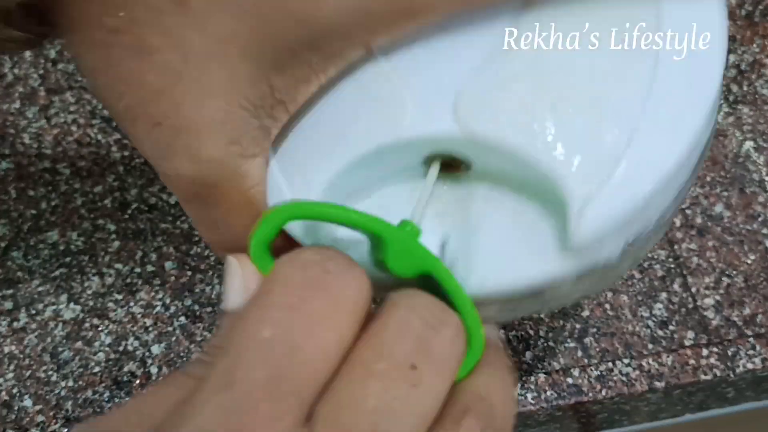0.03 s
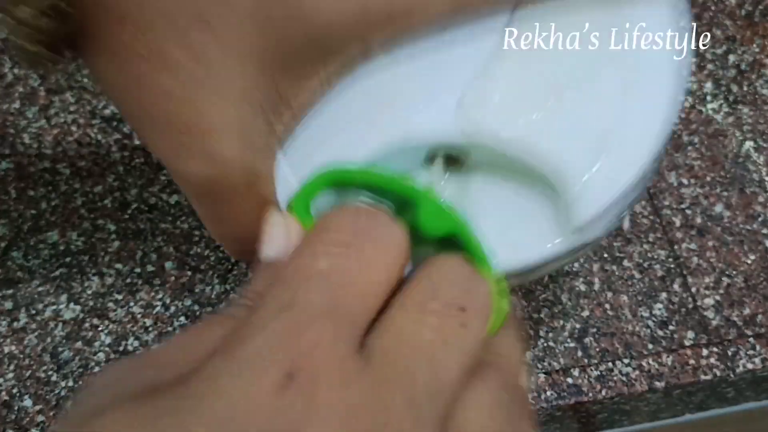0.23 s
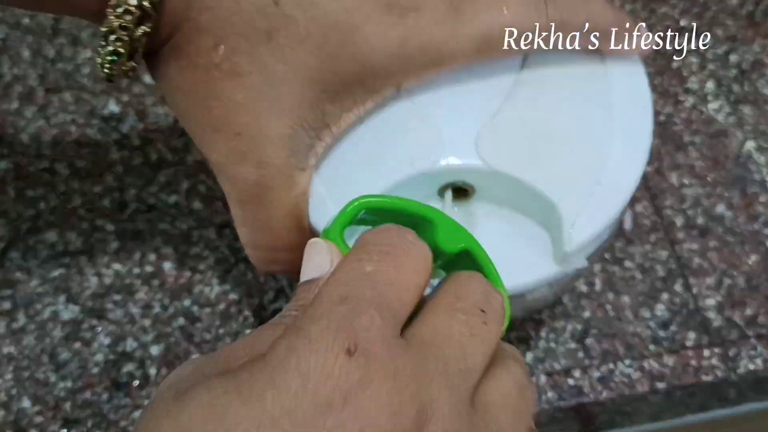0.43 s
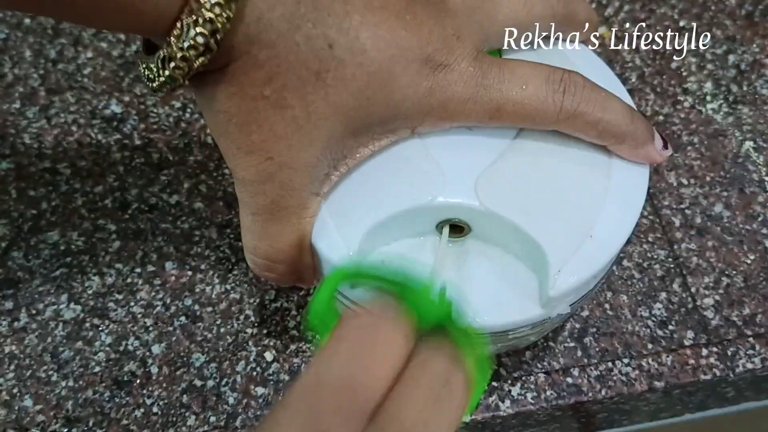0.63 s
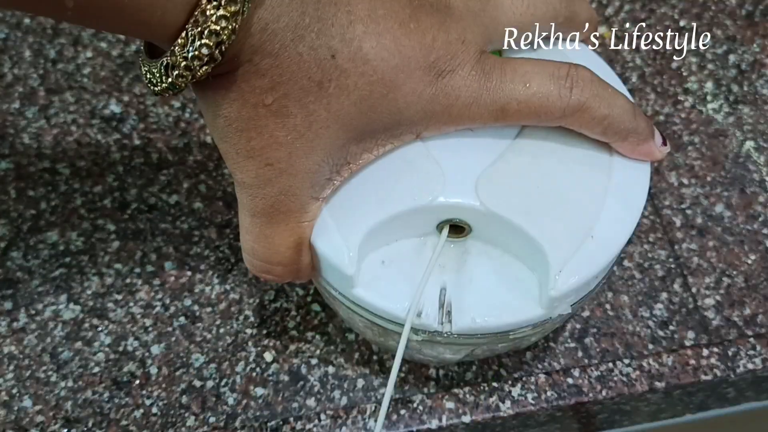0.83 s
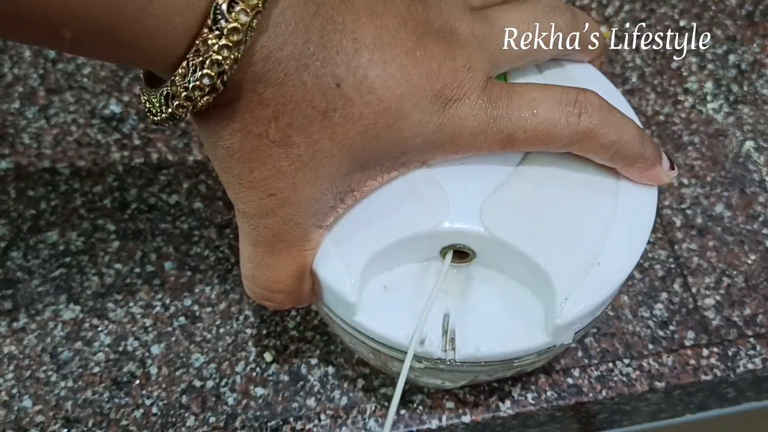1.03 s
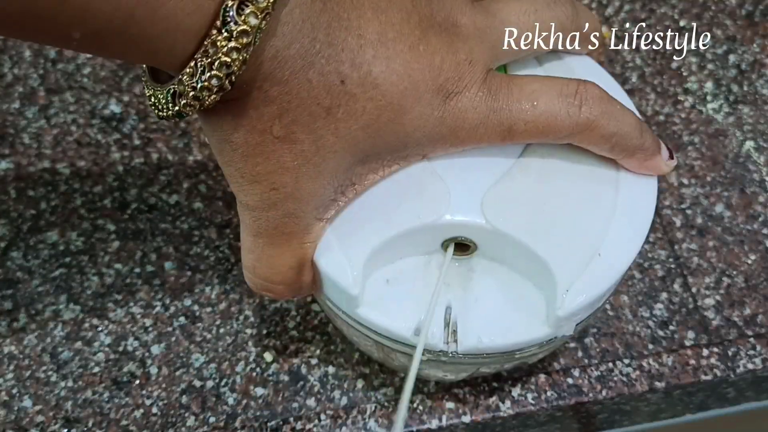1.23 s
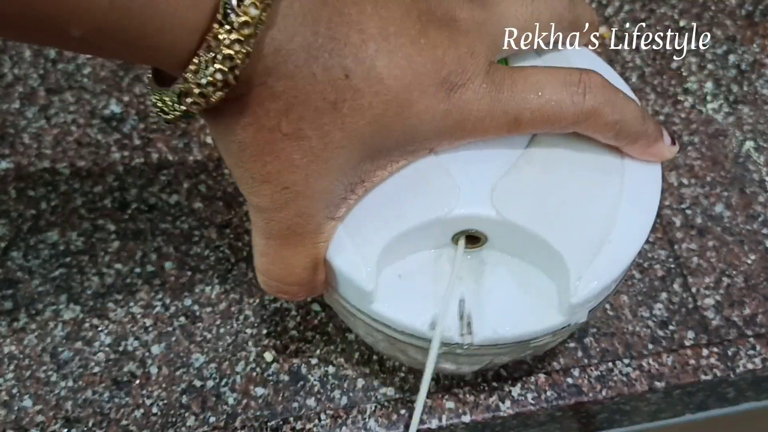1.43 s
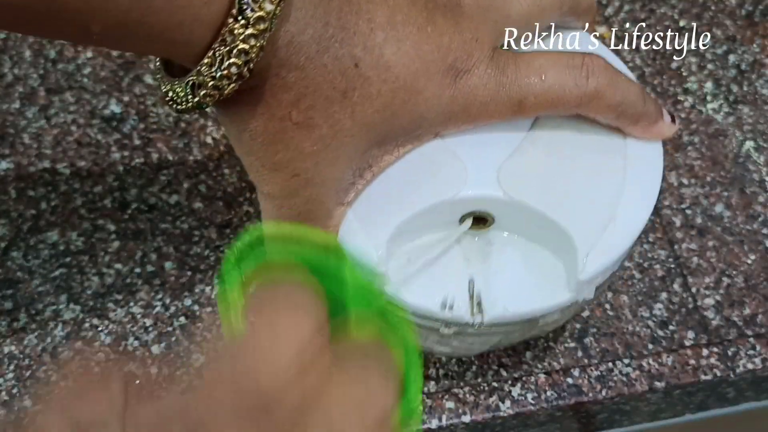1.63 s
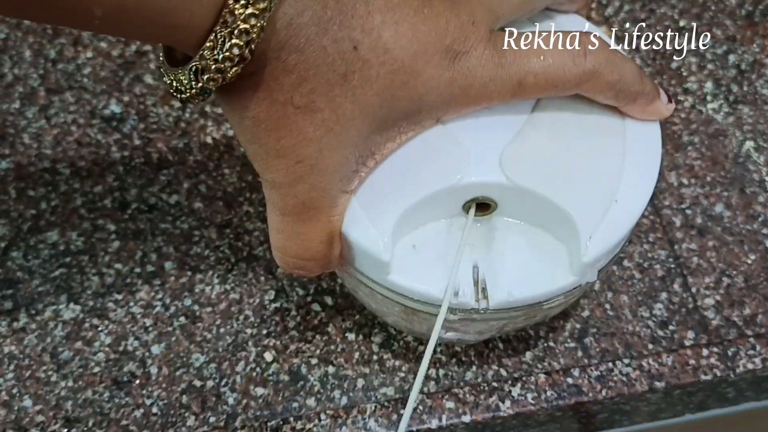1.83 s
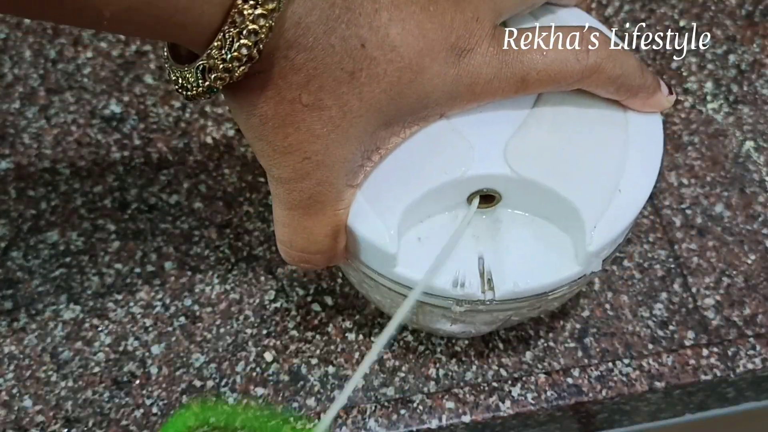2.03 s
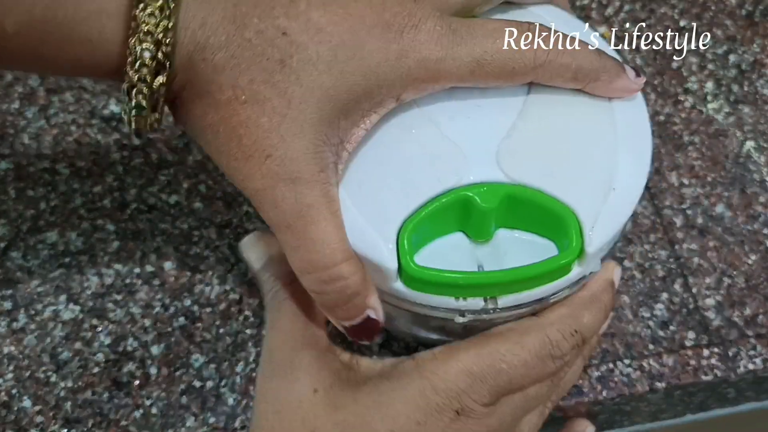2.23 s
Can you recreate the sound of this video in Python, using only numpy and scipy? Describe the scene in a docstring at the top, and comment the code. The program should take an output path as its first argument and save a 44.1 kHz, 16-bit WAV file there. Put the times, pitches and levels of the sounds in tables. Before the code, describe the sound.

Close up in a kitchen, a hand-pulled food chopper gives small plastic knocks and finger rubs, then three whirring, clattering bursts. A high rasp of recoiling cord follows each one, and the chopped pieces finally tumble softly to rest.

```python
"""A faint wash of room ring dies away. A plastic pull-cord food chopper is settled on a stone kitchen
counter: its housing knocks, fingers rub and nails tick. Then the cord is pulled three times. On each
pull the blades fling food against the resonant bowl, the blade shaft sings, and the cord zips taut at
the end of its travel; the spring then reels it in with a bright friction rasp over a slipping ratchet.
At last the pieces tumble to rest and the kitchen's reverberation dies away."""
import sys
import numpy as np
from scipy import signal
from scipy.fft import rfft, irfft
from scipy.io import wavfile

SR = 44100
rng = np.random.default_rng(int(sys.argv[2]) if len(sys.argv) > 2 else 0)


def unload_wav(signal):
    """Save mono or channel-first audio to the path in sys.argv[1] as 16-bit WAV at rate SR, clipped to [-1, 1]."""
    wavfile.write(
        sys.argv[1],
        SR,
        np.round(np.clip(np.atleast_2d(signal).T, -1, 1) * 32767).astype(np.int16),
    )


N = 105840
TAPS = 4096  # samples in a short impulse response

# Spectra of background and reverberation. Each row: frequency in Hz, relative level in dB.
BACKGROUND_SPECTRUM = [(30, 3), (90, 7.5), (160, 0), (400, -3.5), (800, -7.5), (1500, -5.5), (3200, -14),
                       (7000, -12.5), (10000, -27), (16000, -31)]
ROOM_SPECTRUM = [(50, -12.5), (120, 4.5), (400, 0.5), (1500, -2), (4000, -3), (9000, -6.5), (16000, -29)]
# Decay of the kitchen. Each row: frequency in Hz, reverberation time in seconds.
ROOM_DECAY = [(60, 0.81), (150, 0.46), (400, 0.59), (1500, 0.71), (4000, 0.56), (8000, 0.45), (16000, 0.26)]

# Faint tinkling as the hands shift. Each row: start in seconds, length in seconds, level in dB.
TINKLE_BURSTS = [(.095, 0.057, -38.5), (.205, .008, -39), (0.369, .045, -46), (.446, 0.0037, -44)]
# First a faint wash of room ring dying away at the opening; the later rows are finger rubs.
# Each row: start in seconds, length in seconds, level in dB, treble cutoff in Hz.
WASH_AND_RUBS = [(0., 0.026, -41.5, 5130), (0.104, 0.044, -34, 7000), (0.172, 0.038, -43, 3500),
                 (0.236, 0.06, -35, 9050), (0.37, 0.019, -37, 7000), (0.617, 0.017, -32, 4000)]
# Nails and cord on plastic. Each row: start in seconds, level in dB, treble cutoff in Hz.
DRY_TICKS = [(0.1054, -19, 12000), (0.1639, -0.5, 4070), (0.6191, -17, 8900), (0.7433, -22, 9000),
             (1.617, 1.5, 9000), (1.7856, -2, 22000), (2.0365, -16, 7100), (2.0894, -2.5, 7000),
             (2.0981, -0.5, 7000)]
# Knocks of the housing. Each row: start in seconds, thump level in dB, thump pitch in Hz,
# thump's 60 dB decay time in seconds, crack level in dB, crack's treble cutoff in Hz.
HOUSING_KNOCKS = [(0.1194, -11.5, 510, 0.013, -11.5, 3500), (0.2029, -9, 556, 0.019, -44, 1500),
                  (0.2149, -4, 665, 0.026, -11.5, 1800), (.2275, -26, 704, 0.014, -22, 2500),
                  (.2296, 5, 326, 0.016, 1.5, 3600), (.2318, -0.5, 488, 0.014, -31, 3600),
                  (.2452, -9, 600, 0.016, -10, 2500), (.416, -20, 462, 0.04, -32, 2500),
                  (0.4382, -9, 395, 0.016, -22.5, 3000), (0.4505, -9.5, 400, 0.03, -7, 2650),
                  (.4532, -2, 725, .012, -18, 1470), (0.6059, -7.5, 245, 0.029, -19, 1480),
                  (0.6321, -19, 255, 0.021, -14.5, 2940), (.7495, -13, 612, 0.039, -14, 7100),
                  (.7532, -4.5, 628, 0.015, -9.5, 8240), (0.9571, -0.5, 270, 0.029, -2, 1620),
                  (.980, 0, 420, 0.011, -29, 2000), (.9835, -13, 262, 0.0074, -9, 2000),
                  (1.282, -18.5, 400, 0.028, -18, 5030), (1.438, -4, 270, 0.019, -9, 2000),
                  (1.751, -15.5, 296, 0.037, -13, 9000), (2.168, -25.5, 167, 0.045, -42, 3000)]
# Modes of the housing. Each row: ratio to the thump pitch, relative level in dB.
HOUSING_MODES = [(.6, -6), (1, -1.5), (1.62, -6.5), (2.4, -17.5)]

# Envelopes: the force of each pull, the speed of each rewind (as loudness of its rasp) and the
# final tumble. Each row of a curve: time in seconds, relative level in dB.
PULL_FORCES = [
    [(0.75, -37), (0.836, -32), (0.886, -19.5), (0.95, -21), (0.954, -11.5), (1.064, -40.5), (1.07, -40)],
    [(1.27, -36), (1.292, -31.5), (1.308, -34.5), (1.356, -21), (1.45, -17.5), (1.504, -33), (1.53, -35)],
    [(1.75, -50), (1.752, -28), (1.87, -22), (1.878, -22.5), (1.89, -21.5), (1.956, -25.5), (2.0, -53)],
]
REWIND_SPEEDS = [
    [(1.03, -41), (1.08, -21.5), (1.12, -18), (1.186, -22.5), (1.268, -42.5), (1.28, -32.5)],
    [(1.5, -28.5), (1.516, -43), (1.54, -22), (1.616, -16), (1.67, -31.5), (1.745, -39.5)],
    [(1.98, -38.5), (2.018, -21.5), (2.046, -16.5), (2.096, -18.5), (2.155, -32.5)],
]
TUMBLE_ENVELOPE = [(2.163, -27.5), (2.22, -32.5), (2.3, -39.5), (2.4, -51)]
# The cord coming taut. Each row: start in seconds, time until decay in seconds, level in dB.
CORD_ZIPS = [(0.899, 0.0033, -24.5), (0.9575, .007, -20), (1.439, 0.0054, -18), (1.924, 0.0076, -24)]
# Large pieces striking the bowl. Each row: start in seconds, peak level in dB.
CHUNK_STRIKES = [(0.774, -21), (0.7949, -15.5), (0.806, -25), (0.8756, -1), (0.8796, -17), (0.8888, -19),
                 (0.901, -7), (0.914, -3), (0.9278, 1), (1.3592, -7), (1.37, -9), (1.377, -7),
                 (1.4009, -17), (1.414, -13), (1.844, -10), (1.869, -24), (1.894, -9)]

# Smooth spectra of the brief sounds, then of the lid, the reel (cord guide and spring) and the bowl.
# Each row: frequency in Hz, relative level in dB.
WASH_AND_RUB_SPECTRUM = [(100, -2), (400, 12.5), (900, 4), (2500, -2.5), (5000, -2), (8500, 0.5),
                         (10000, -6), (16000, -5)]
TICK_SPECTRUM = [(100, -19), (700, -9.5), (1400, 0), (2300, 0), (4000, 3), (6000, 2.5), (9000, 2.5),
                 (16000, -17)]
CRACK_SPECTRUM = [(60, -78), (300, 2.5), (1000, 7.5), (1600, 5), (2200, 3.5), (4000, 9), (5500, 4.5),
                  (8000, 9), (16000, 2)]
TUMBLE_SPECTRUM = [(40, -25), (85, 0), (140, 1.5), (420, 4), (900, -10.5), (1700, -10), (2400, -26.5),
                   (7000, -21.5), (10000, -40), (16000, -39)]
SLIDE_SPECTRUM = [(200, -15), (1500, -11), (3500, 14), (5000, 0), (7500, 0.5), (9500, -5.5), (12000, -11),
                  (16000, -3)]
LID_SPECTRUM = [(50, -57), (140, -14.5), (300, -1), (800, -9), (1500, -7), (2150, -16), (4000, -12.5),
                (7000, -14), (16000, -27.5)]
REEL_SPECTRUM = [(200, -57), (2000, -24), (4000, -28), (5300, -26), (6600, -13.5), (8200, -10), (9700, -10),
                 (10500, -15.5), (12100, -30), (13000, -12), (14000, -23), (15200, -20)]
BOWL_SPECTRUM = [(50, -42), (130, -16), (260, -15.5), (430, -8.5), (1000, -15.5), (1600, -6), (2050, -16),
                 (3600, -15), (5000, -19.5), (7500, -19.5), (9500, -28), (16000, -27)]
# Resonances of those three bodies. Each row: frequency in Hz, half-width in Hz, relative level in dB.
LID_RESONANCES = [(330, 56, -2), (564, 35, 1), (1713, 69, -1), (3018, 110, -5)]
REEL_RESONANCES = [(2920, 54, -25), (4010, 140, -6.5), (6040, 63, -7.5), (7090, 73, 2.5), (7170, 97, 0.5),
                   (7530, 160, -2), (8100, 170, -2.5), (9100, 120, -1.5), (9190, 72, 1.5), (11450, 120, -3),
                   (12670, 88, 0.5), (12700, 150, -9), (13500, 90, -6), (14750, 200, -8)]
BOWL_RESONANCES = [(284, 73, -6), (555, 59, -6.5), (785, 77, -3), (1040, 85, -5), (1370, 130, -8),
                   (1698, 73, -2), (2930, 210, -13), (7220, 84, -12), (11500, 150, -34), (12650, 130, -33)]


def amp(db):
    """Amplitude ratio of a level in decibels."""
    return 10 ** (np.asarray(db) / 20)


def unit_rms(x):
    """Normalisation to an rms of one."""
    return x / np.sqrt(np.mean(x ** 2) + 1e-20)


def decay(t, t60):
    """Exponential damping by 60 dB in t60 seconds."""
    return np.exp(-np.log(1000) * t / t60)


def at_frequency(points, hz):
    """Interpolation on a logarithmic frequency axis."""
    f, value = np.transpose(points)
    return np.interp(np.log(hz + 1), np.log(f), value)


def add(mix, start, sound):
    """Superposition of a sound on the mix, from a start in seconds."""
    part = mix[round(start * SR):][:len(sound)]
    part += sound[:len(part)]


def envelope(curve, fade_db_per_s=2500):
    """Amplitude along a level curve, falling exponentially outside its span."""
    times, db = np.transpose(curve)
    t = np.arange(N) / SR
    outside_s = abs(t - np.clip(t, times[0], times[-1]))
    return amp(np.interp(t, times, db) - fade_db_per_s * outside_s)


def response(spectrum, resonances=(), cutoff_hz=None):
    """Minimum-phase impulse response of a resonant body, with a peak of one."""
    hz = np.fft.rfftfreq(TAPS, 1 / SR)
    power = amp(at_frequency(spectrum, hz)) ** 2
    for centre, width, db in resonances:
        power += amp(db) ** 2 / (1 + ((hz - centre) / width) ** 2) ** 2
    if cutoff_hz:
        power /= (1 + (hz / cutoff_hz) ** 2) ** 2
    cepstrum = irfft(np.log(power) / 2)
    cepstrum[1:TAPS // 2] *= 2  # folding the cepstrum makes the response causal
    cepstrum[TAPS // 2 + 1:] = 0
    ring = irfft(np.exp(rfft(cepstrum)))
    return ring / abs(ring).max()


def through(x, ring):
    """Convolution of an excitation with an impulse response."""
    return signal.fftconvolve(x, ring)[:N]


def impacts(per_s, spread_db):
    """Shot noise: independent impulses of uneven size at a steady mean rate."""
    size = amp(spread_db * np.minimum(rng.exponential(1, N), 3.0))
    return size * rng.choice([-1, 1], N) * (rng.random(N) < per_s / SR)


def background():
    """Stationary noise, strongest in the bass, lies under the scene."""
    return amp(-47.5) * unit_rms(through(rng.standard_normal(N), response(BACKGROUND_SPECTRUM)))


def reverberation(x, delay_s=0.0023):
    """Reflections form a diffuse tail whose treble is absorbed first."""
    hz, t, spectra = signal.stft(rng.standard_normal(SR), SR, nperseg=256)
    damped = spectra * decay(t, at_frequency(ROOM_DECAY, hz)[:, None])
    tail = signal.istft(damped, SR, nperseg=256)[1][:SR]
    tail *= np.arange(SR) / SR > delay_s
    colour = amp(at_frequency(ROOM_SPECTRUM, np.fft.rfftfreq(SR, 1 / SR)))
    return through(x, irfft(rfft(tail / np.linalg.norm(tail)) * colour))


def room_mode(x, hz=88.4, rise_s=0.035, t60=0.37):
    """The kitchen's lowest standing wave swells and decays after each blow."""
    t = np.arange(SR) / SR
    swell = (1 - np.exp(-t / rise_s)) * decay(t, t60)
    return amp(-43) * through(x, swell * np.sin(2 * np.pi * hz * t))


def tinkles(low_hz=6900, high_hz=13460, per_s=260, t60=0.019):
    """Small metal, perhaps a bangle, vibrates freely in damped pings of random pitch."""
    out, t = np.zeros(N), np.arange(TAPS) / SR
    for start, length, db in TINKLE_BURSTS:
        for when, pitch, size in rng.random((1 + int(per_s * length), 3)):
            hz = low_hz * (high_hz / low_hz) ** pitch
            ping = np.sin(2 * np.pi * hz * t) * decay(t, t60)
            add(out, start + when * length, amp(db) * (0.5 + size) * ping)
    return out


def wash_and_rubs():
    """Dense shot noise: a faint wash of room ring dies away at the opening; later, fingers scuff."""
    out = np.zeros(N)
    for start, length, db, cutoff_hz in WASH_AND_RUBS:
        colour = response(WASH_AND_RUB_SPECTRUM, cutoff_hz=cutoff_hz)
        grains = through(impacts(per_s=6000, spread_db=3), colour)
        out += envelope([(start, db), (start + length, db)], fade_db_per_s=1200) * unit_rms(grains)
    return out


def ticks():
    """Brief contacts of nails and cord give broadband clicks without resonance."""
    out = np.zeros(N)
    for start, db, cutoff_hz in DRY_TICKS:
        add(out, start, amp(db) * response(TICK_SPECTRUM, cutoff_hz=cutoff_hz))
    return out


def housing_knocks(rattle_gain=0.092, rattle_decay_s=0.0053, thump_rise_s=0.0017):
    """Each impact gives a plastic crack and excites the housing's damped modes in a thump."""
    out, t = np.zeros(N), np.arange(TAPS) / SR
    for start, thump_db, hz, t60, crack_db, cutoff_hz in HOUSING_KNOCKS:
        contact = rattle_gain * rng.standard_normal(TAPS) * np.exp(-t / rattle_decay_s)
        contact[0] = 1  # the blow itself, ahead of the rattle of loose parts
        crack = through(contact, response(CRACK_SPECTRUM, cutoff_hz=cutoff_hz))
        add(out, start, amp(crack_db) * crack)
        modes = sum((-1) ** k * amp(db) * np.sin(2 * np.pi * hz * ratio * t)
                    for k, (ratio, db) in enumerate(HOUSING_MODES))
        thump = modes * decay(t, t60) * (1 - np.exp(-t / thump_rise_s))
        add(out, start, amp(thump_db) * thump)
    return out


def tumbling():
    """As the blades coast, the pieces drop in dull impacts of falling amplitude."""
    taps = through(impacts(per_s=400, spread_db=0.5), response(TUMBLE_SPECTRUM))
    return envelope(TUMBLE_ENVELOPE) * unit_rms(taps)


def blade_shaft(ring_hz=1680, half_width_hz=80):
    """Forced resonance: the shaft rings as long as it spins."""
    force = sum(envelope(pull, fade_db_per_s=11997) for pull in PULL_FORCES)
    spin = force ** 0.43  # even a light pull makes it sing
    hz = np.fft.rfftfreq(TAPS, 1 / SR)
    shaft = irfft(1 / (1 + 1j * (hz - ring_hz) / half_width_hz) ** 2)
    scrape = unit_rms(impacts(per_s=1500, spread_db=2))
    return amp(-19.5) * through(spin * scrape, shaft / np.linalg.norm(shaft))


def cord_slide(force):
    """Friction noise of the cord leaving its guide grows in proportion to the pull."""
    hiss = through(rng.standard_normal(N), response(SLIDE_SPECTRUM))
    return amp(-10) * force * unit_rms(hiss)


def cord_zips(rise_s=0.0026, fall_s=0.0027, spring_decay_s=0.024):
    """A burst of friction excites the reel as the cord comes taut; the spring rings on."""
    drive, t = np.zeros(N), np.arange(2 * TAPS) / SR
    for start, length, db in CORD_ZIPS:
        after = np.maximum(t - length, 0)
        release = np.exp(-after / fall_s) + amp(-4.5) * np.exp(-after / spring_decay_s)
        burst = np.minimum(t / rise_s, 1) * release * rng.standard_normal(len(t))
        add(drive, start, amp(db) * burst)
    reel = response(REEL_SPECTRUM, REEL_RESONANCES)
    return through(drive, reel / np.linalg.norm(reel))


def rewinding():
    """Friction of the returning cord drives the reel's resonances; the slipping ratchet, the lid's."""
    speed = sum(envelope(rewind) for rewind in REWIND_SPEEDS)
    rasp = through(impacts(per_s=6000, spread_db=4.5), response(REEL_SPECTRUM, REEL_RESONANCES))
    ratchet = through(impacts(per_s=1000, spread_db=1.5), response(LID_SPECTRUM, LID_RESONANCES))
    return amp(1) * speed * unit_rms(rasp) + amp(-5.5) * speed ** 0.79 * unit_rms(ratchet)


def food_contact(cutoff_hz, rise_s=0.00013, crumble_s=0.00095):
    """Inelastic impact of one piece: a push, then crumbling, brighter if harder; unit energy."""
    t = np.arange(512) / SR
    contact = rng.standard_normal(len(t)) * (1 - np.exp(-t / rise_s)) * np.exp(-t / crumble_s)
    contact = signal.lfilter(*signal.butter(1, cutoff_hz, fs=SR), contact)
    return contact / np.linalg.norm(contact)


def chopping(force, pieces_per_s=1000, soft_hz=2300, hard_hz=11800):
    """Impact excitation of the bowl: small pieces hail as hard as the pull; large ones strike singly."""
    bowl = response(BOWL_SPECTRUM, BOWL_RESONANCES)
    cutoffs = np.geomspace(soft_hz, hard_hz, num=20)
    hail = sum(through(impacts(pieces_per_s / len(cutoffs), spread_db=3), food_contact(hz))
               for hz in cutoffs)
    drive = amp(1.5) * force * hail / through(hail, bowl).std()
    chunks = np.zeros(N)
    for start, db in CHUNK_STRIKES:
        strike = signal.fftconvolve(food_contact(cutoff_hz=7240), bowl)
        add(chunks, start, amp(db) * strike / abs(strike).max())
    return through(drive, bowl) + chunks


def scene():
    """Superposition of the direct sound, the kitchen's response and the quiet background."""
    handling = housing_knocks() + ticks() + wash_and_rubs() + tinkles()
    force = sum(envelope(pull) for pull in PULL_FORCES)
    work = chopping(force) + cord_slide(force) + blade_shaft() + cord_zips() + tumbling()
    rewind = rewinding()
    direct = handling + work + rewind
    room = reverberation(amp(-6) * handling + amp(-9) * work + amp(-11.5) * rewind) + room_mode(direct)
    return (direct + room + background())[None]


def record(dry):
    """The microphone limits the band and saturates softly on peaks; the level dips briefly once."""
    low_cut_hz, high_cut_hz, ceiling = 71, 15500, 0.85
    dip_at_s, dip_half_width_s, dip_db = 2.159, 0.0044, -15
    thinned = signal.sosfilt(signal.butter(3, low_cut_hz, "high", fs=SR, output="sos"), dry)
    rounded = thinned / (1 + (thinned / ceiling) ** 6) ** (1 / 6)
    t = np.arange(N) / SR
    dip = amp(dip_db * np.exp(-((t - dip_at_s) / dip_half_width_s) ** 4))
    low_pass = signal.firwin(511, high_cut_hz, window=("kaiser", 9), fs=SR)
    return signal.oaconvolve(rounded * dip, low_pass[None], "same")


dry = scene()
out = record(dry)
unload_wav(out)
```